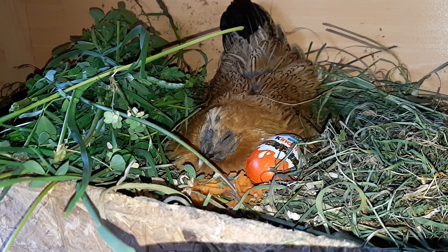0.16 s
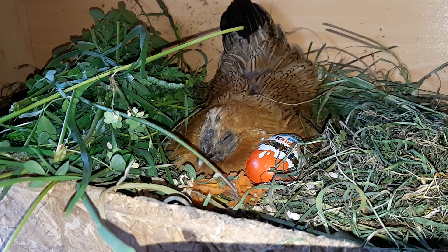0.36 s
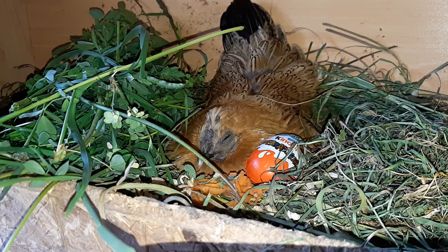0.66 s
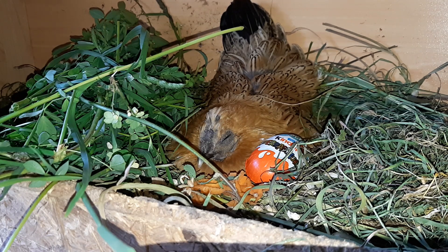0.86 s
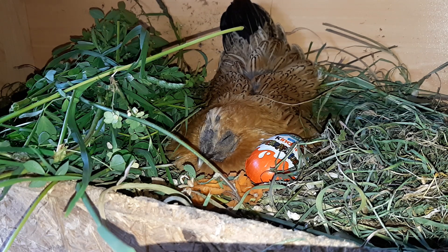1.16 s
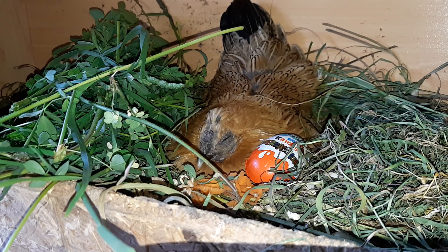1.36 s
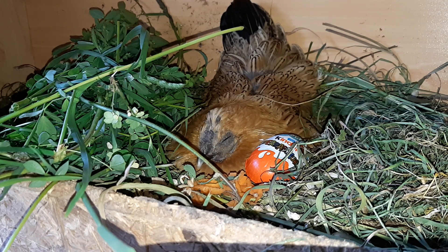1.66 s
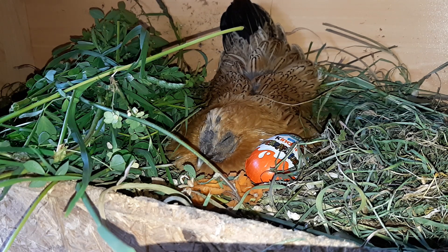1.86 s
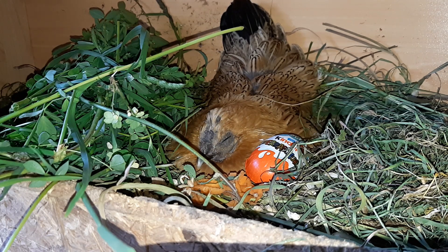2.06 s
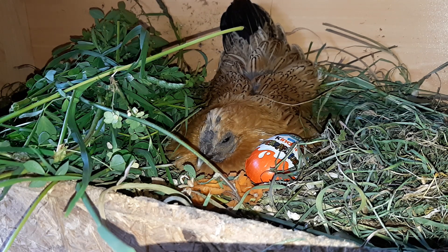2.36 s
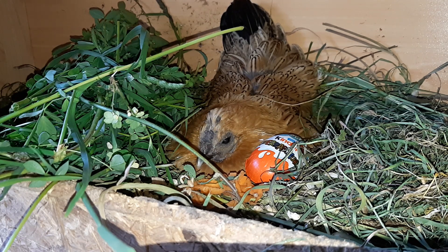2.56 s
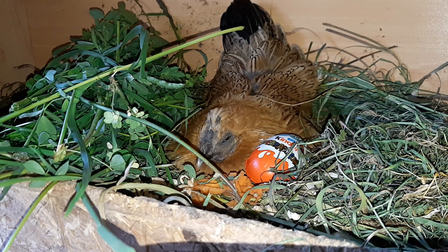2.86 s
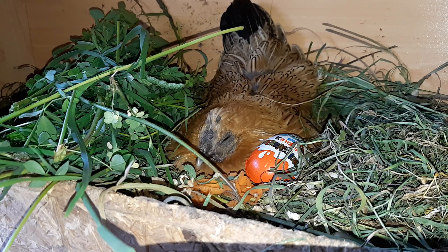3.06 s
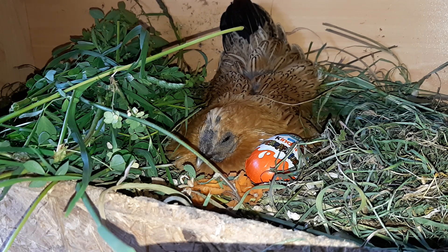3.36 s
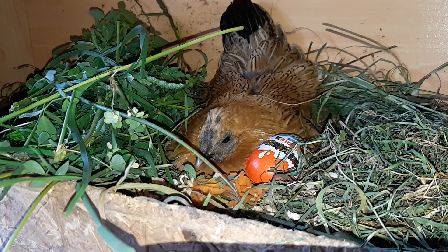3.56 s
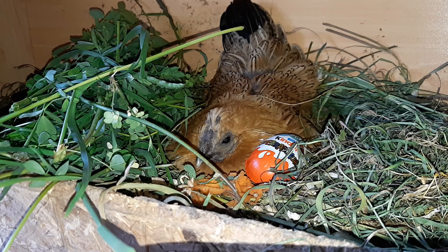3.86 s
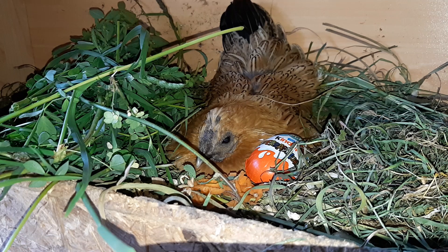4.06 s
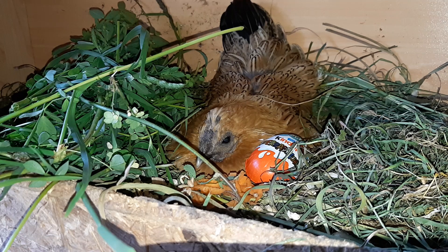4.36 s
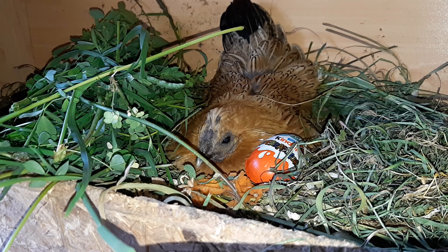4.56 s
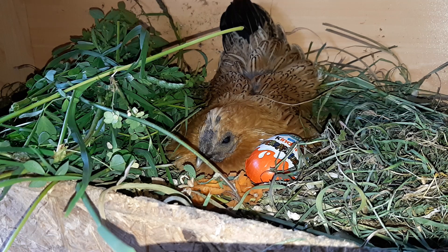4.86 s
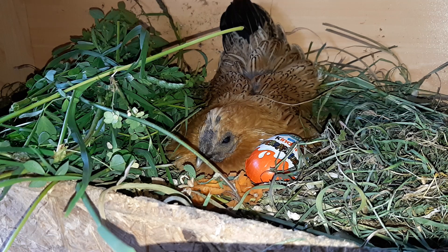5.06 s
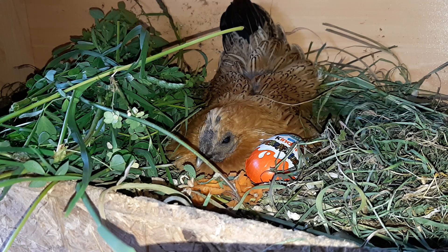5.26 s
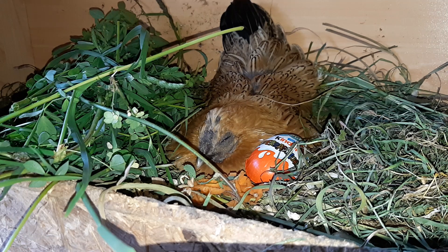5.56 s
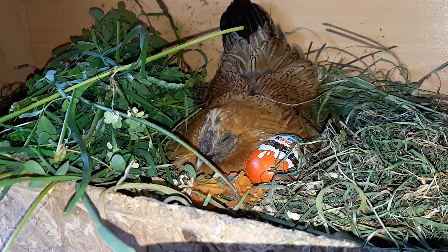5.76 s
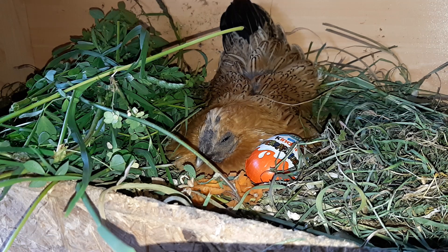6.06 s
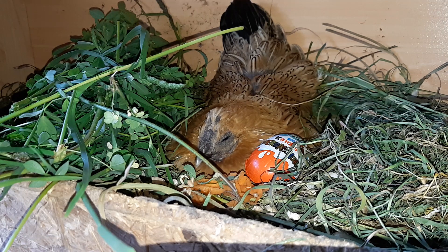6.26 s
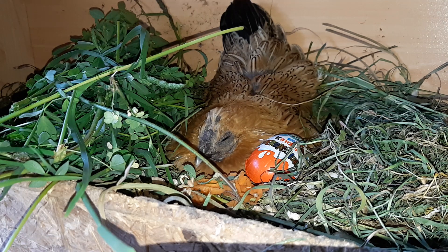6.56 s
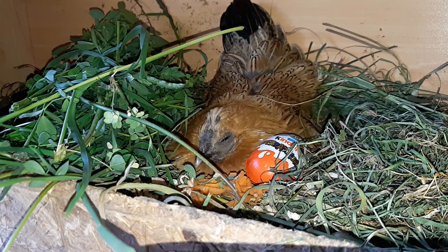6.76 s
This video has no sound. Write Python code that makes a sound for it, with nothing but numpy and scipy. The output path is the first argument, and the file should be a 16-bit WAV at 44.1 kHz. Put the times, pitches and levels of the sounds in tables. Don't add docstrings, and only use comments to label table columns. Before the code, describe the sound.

Close stereo sound inside a small wooden shed: soft steady hiss and a low rumble that swells with footfalls, strongest around 2 seconds. A hen shifts faintly in dry hay at the start, with a short rustle and woody tapping at 0.2-0.45. Small ticks come at 0.8 and 0.9, a clearer tap at 1.65. Then three hard, bright knocks at 1.87, 2.09 and 2.31 ring a sheet and fill the shed briefly; the second is hardest, the third dullest. From 2.5 to 2.95 the hen croons softly through a shut beak, low and rising, with a barely audible falling end near 3.2. Light taps and rustles follow at 3.3-3.7 and 4.0. From 4.6 to 5.9 hay crackles and snaps in bursts, strongest near 4.75 and 5.7, with dull body bumps at 5.36 and 5.82. Separate woody taps sound at 5.98, 6.64 and 6.8, with a last faint rustle.

```python
import sys
import numpy as np
from scipy import signal
from scipy.io import wavfile
from scipy.ndimage import uniform_filter1d

SR = 44100
rng = np.random.default_rng(int(sys.argv[2]) if len(sys.argv) > 2 else 0)


def ratio_of_db(decibels):
    return 10 ** (np.asarray(decibels, float) / 20)


def inscribe(sig):
    pcm = np.round(np.clip(np.atleast_2d(sig).T, -1, 1) * 32767)
    wavfile.write(sys.argv[1], SR, pcm.astype(np.int16))


N = 305613

# (frequency [Hz], 60 dB decay [s])
SHED_DECAY = [(100, 0.57), (400, 0.26), (1500, 0.24), (4000, 0.2), (9000, 0.18), (16000, .15)]
EDGE_HZ = 15850
RING_SPLIT = 0.0122
SECOND_RING_DB = -4


def evened(x):
    return x / np.sqrt(np.mean(x ** 2) + 1e-20)


def read(points, hz):
    f, value = np.transpose(points)
    return np.interp(np.log(hz + 1), np.log(f + 1), value)


def add(mix, s, sound):
    part = mix[:, round(s * SR):][:, :sound.shape[-1]]
    part += sound[..., :part.shape[1]]


def power_db(p):
    return 10 * np.log10(p + 1e-14)


def hump(hz, centre_hz, octaves):
    return np.exp(-(np.log2((hz + 1) / centre_hz) / octaves) ** 2) / centre_hz


def peaks_db(hz, peaks):
    return sum(db * np.exp(-(np.log2((hz + 1) / f) / octaves) ** 2) for f, octaves, db in peaks)


def noise(count, field_db, size=512):
    # (frequency [Hz], left-right likeness [-1 to 1])
    likeness = [(25, .985), (60, .95), (150, .91), (300, .88), (600, .68), (1200, -.35), (2500, 0.1),
                (16000, .05)]
    hop = size // 4
    hz = np.fft.rfftfreq(size, 1 / SR)[:, None]
    t = np.arange(count // hop + 5) * hop / SR
    a, b, c, d = rng.standard_normal((len(t), len(hz), 4)).T
    same = np.clip(read(likeness, hz), -1, 1)
    left = a + 1j * b
    right = same * left + np.sqrt(1 - same ** 2) * (c + 1j * d)
    z = np.array([left, right]) * ratio_of_db(field_db(hz, t)) * (hz < EDGE_HZ)
    return signal.istft(z, nperseg=size, noverlap=size - hop)[1][:, :count]


def spread(colour_db, decay, rise_s, hold_s, count, swell_s=1e-4):
    swell_hz = 2200
    standing_db = 1.6 * rng.standard_normal((257, 1))

    def field_db(hz, t):
        build_up = 1 - np.exp(-(t + 0.0037) * np.maximum(hz / swell_hz, 1) / swell_s)
        fall_db = 60 * np.maximum(t - hold_s, 0) / (decay * read(SHED_DECAY, hz))
        return colour_db(hz) + standing_db + 2 * power_db(build_up) - fall_db

    x = noise(count, field_db) * (1 - np.exp(-np.arange(count) / SR / rise_s))
    return x / np.sqrt(np.mean(x[:, 200:1500] ** 2))


def ring(modes, rise_s, alike=0.13, length=SR * 3 // 4):
    t = np.arange(length)[None] / SR
    phases = 2 * np.pi * rng.random((len(modes), 2)) * [1, 1 - alike]
    out = 0
    for (hz, db, t60), p in zip(modes, phases):
        phase = np.cumsum(p)[:, None]
        out = out + ratio_of_db(db - 60 * t / t60) * np.sin(2 * np.pi * hz * t + phase)
    return out * (1 - np.exp(-t / rise_s))


def band(db, hz, width, t60, rise_s):
    t = np.arange(SR // 4) / SR
    r = np.exp(-np.pi * width / SR)
    a, b = rng.standard_normal((2, 2, len(t) + 2000))
    slow = signal.lfilter([1], [1, -2 * r, r * r], a + 1j * b)[:, 2000:]
    tone = evened((slow * np.exp(2j * np.pi * hz * t)).real)
    return ratio_of_db(db - 60 * t / t60) * (1 - np.exp(-t / rise_s)) * tone


def swells(rows, t, shift_db=0):
    s, db, rise, fall = np.array(rows)[:, :4].T[:, :, None]
    drop_db = 20 * np.maximum((s - t) / rise, (t - s) / fall)
    return (ratio_of_db(db + shift_db - drop_db) ** 2).sum(0)


def hiss():
    # (frequency [Hz], density [dB per Hz])
    hiss_colour = [(88, -31.5), (150, 1), (292, -19), (329, -11), (408, -24.5), (487, -17), (604, -17),
                   (4140, -23), (12900, -20), (16300, -17.5)]
    level_db = -77 + 2.5
    return ratio_of_db(level_db) * evened(noise(N, lambda hz, t: read(hiss_colour, hz) - 30 * (hz < 200), size=1024))


def rumble():
    # (frequency [Hz], density [dB per Hz])
    rumble_colour = [(12, -12), (30, -4), (40, -6), (50, 3), (64, -5.5), (95, -16), (120, -13), (160, -22),
                     (210, -36.5), (300, -41.5), (800, -94)]
    # (peak time [s], peak level [dB], rise over 20 dB [s], fall over 20 dB [s])
    steps = [(.1, -65.5, 0.24, 1), (.37, -59, 0.36, 0.39), (.8, -65, 0.4, 1), (1.21, -60, 0.098, 0.2),
             (1.41, -64, 0.11, 0.17), (1.7, -54, 0.12, 0.13), (1.89, -50.5, 0.056, 0.4),
             (2.14, -45.5, 0.16, 0.24), (2.33, -48.5, 0.038, 0.33), (2.6, -66, 0.23, 0.1),
             (2.78, -72.5, 0.2, 0.2), (3.57, -65, 0.081, .12), (3.72, -56.5, 0.053, 0.27),
             (4.03, -57, 0.089, 0.23), (5.25, -60.5, 0.51, .08), (5.38, -59, .1, 0.15),
             (5.6, -58.5, 0.079, 0.67), (6.14, -66, 0.42, 0.61), (6.52, -67.5, 0.12, 0.83),
             (6.87, -69, 0.37, .3)]
    floor_db = -66.5
    t = np.arange(0, N, 256) / SR
    level = np.interp(np.arange(N) / SR, t, np.sqrt(ratio_of_db(floor_db) ** 2 + swells(steps, t)))
    return level * evened(noise(N, lambda hz, t: read(rumble_colour, hz), size=4096))


def pair(rows, first, second):
    # (frequency [Hz], width [octaves], level [dB])
    box_air = [(537, 0.11, -9), (810, 0.23, 0.5), (1178, .1, -4), (1500, .12, 3), (2223, 0.053, 3.5),
               (3200, .06, 0.5)]
    shift_db = np.array(rows)[:, 4:]

    def share(p):
        return p / p.mean() * 3 / 512

    def field_db(hz, t):
        power = share(first(hz)) * swells(rows, t) + share(second(hz)) * swells(rows, t, shift_db)
        return peaks_db(hz, box_air) + power_db(power)

    return noise(N, field_db)


def hay():
    # (peak time [s], peak level [dB], rise over 20 dB [s], fall over 20 dB [s], stems against leaves [dB])
    rustles = [(.005, -67, 0.024, 0.18, -20), (.24, -69.5, 0.16, 0.11, -9.5), (.35, -60, 0.055, 0.23, -28),
               (.425, -54.5, 0.054, 0.065, 7), (1.18, -80.5, 0.042, 0.14, 3), (1.61, -76, 0.067, 0.28, -20),
               (3.35, -60.5, 0.1, 0.067, -10), (3.445, -63, 0.11, 0.075, -21),
               (4.6, -58.5, 0.12, .3, -12.5), (4.735, -40.5, 0.093, 0.14, -5),
               (4.84, -47.5, 0.077, 0.093, -4), (4.96, -54.5, 0.23, 0.11, 0.5),
               (5.06, -58.5, 0.11, 0.47, -4.5), (5.26, -56.5, 0.09, 0.223, -8.5),
               (5.36, -54.5, 0.06, 0.13, -6), (5.55, -57.5, 0.32, 0.58, -10.5),
               (5.715, -45, 0.047, 0.15, -5), (5.68, -53, 0.19, 0.06, -7.5),
               (6.62, -78.5, .05, 0.056, -18.5), (6.83, -65, 0.065, 0.14, 0)]
    # (peak time [s], peak level [dB], rise over 20 dB [s], fall over 20 dB [s],
    # deep push against bedding [dB])
    settles = [(.03, -66.5, 0.037, 0.1, -2.5), (.25, -65.5, 0.059, 0.075, -10), (.36, -51, 0.021, 0.15, -5),
               (.425, -48.5, 0.084, 0.083, -25), (1.17, -74, 0.024, 0.093, -21),
               (3.36, -76, 0.033, .08, -3), (3.71, -79, 0.041, 0.093, 11), (4.03, -67, 0.028, 0.1, -8),
               (4.6, -72, 0.14, 0.4, 0), (4.74, -49.5, 0.064, 0.2, -2.5), (4.84, -55.5, 0.045, 0.22, 1.5),
               (4.96, -51, 0.064, 0.12, 6.5), (5.06, -64, 0.089, 0.17, 11), (5.2, -69, 0.33, 0.55, 7.5),
               (5.63, -73.5, 0.032, 0.041, 11), (5.36, -48.5, 0.019, 0.11, -2), (5.75, -54, 0.11, 0.19, -8),
               (5.84, -39, 0.039, 0.083, -5)]
    # (frequency [Hz], density [dB per Hz])
    leaves = [(1760, -20), (3000, -0.5), (5290, 0), (5930, 1.5), (9070, 2.5), (15100, -5), (16000, 4),
              (16300, -20)]
    snaps = ratio_of_db(3.4 * rng.exponential(1, N).clip(0, 3.2)) * (rng.random(N) < 400 / SR)
    crackle = signal.lfilter([1], [1, -np.exp(-1 / (0.0067 * SR))], snaps ** 2)
    sharp = signal.lfilter([1], [1, -np.exp(-1 / (0.0006 * SR))], snaps ** 2)
    blurred = 0.29 * crackle / (crackle.mean() + 1e-9)
    fronts = 0.056 * sharp / (sharp.mean() + 1e-9)
    crackle = np.sqrt(0.57 + blurred + fronts)
    dry_hay = pair(rustles, lambda hz: ratio_of_db(read(leaves, hz)) ** 2, lambda hz: hump(hz, 1920, 1.0))
    soft = pair(settles, lambda hz: hump(hz, 458, 0.91), lambda hz: hump(hz, 220, 0.94))
    return (ratio_of_db(0.98) * crackle * dry_hay + ratio_of_db(-4.5) * soft) * ratio_of_db([[-1.2], [.8]])


def boards():
    # (time [s], level [dB], frequency [Hz], width
    # [Hz], decay [s])
    board_bands = [(.2, -69.5, 727, 60, 0.39), (0.33, -55, 441, 90, 0.5), (0.391, -48, 1350, 50, 0.24),
                   (.4, -52, 2350, 59.7, 0.22), (0.406, -44.5, 1860, 40, 0.19),
                   (0.411, -46.5, 2614, 29.8, 0.18), (0.411, -51, 3140, 50, 0.19),
                   (1.59, -75, 7550, 700, 0.51), (1.59, -70, 11100, 2500, .2),
                   (1.882, -27.5, 1862, 91, .22), (2.1, -23.5, 2850, 60, 0.25), (2.311, -32, 1003, 60, .16),
                   (2.311, -23, 2640, 120, 0.17), (3.285, -52, 2570, 299, 0.17),
                   (3.285, -52, 3200, 302, 0.22), (3.285, -57, 860, 249, 0.18),
                   (3.3, -56.5, 6510, 200, 0.11), (3.33, -54.5, 739, 120, 0.19),
                   (3.405, -69.5, 3045, 149, 0.16), (3.42, -71, 5300, 250, .3), (3.43, -65, 6460, 300, .25),
                   (3.447, -76, 1900, 100, 0.28), (3.61, -67.5, 2490, 303, 0.24),
                   (3.612, -70.5, 4420, 349, 0.19), (3.615, -72, 3313, 249, 0.26),
                   (3.665, -67.5, 3300, 400, 0.31), (3.695, -68, 3200, 400, 0.2),
                   (3.695, -73, 2200, 400, 0.17), (3.691, -57.5, 1520, 200, 0.21),
                   (4.016, -69, 3510, 50, 0.21), (4.019, -67.5, 4520, 300, 0.21),
                   (4.018, -75.5, 6200, 200, 0.25), (4.018, -78.5, 7800, 250, 0.25),
                   (4.018, -71.5, 2685, 79.8, 0.19), (5.978, -55, 4740, 219.5, 0.24),
                   (5.978, -62.5, 6200, 350, 0.24), (5.978, -62, 7680, 390, 0.24),
                   (6.637, -51, 3430, 450, 0.22), (6.637, -57.5, 4800, 408, 0.23),
                   (6.636, -63, 6200, 200, 0.2), (6.636, -63, 7760, 199, 0.17),
                   (6.797, -63, 7740, 402, 0.28),
                   (1.876, -38.5, 8500, 1500, 0.23), (1.655, -63, 3360, 200, 0.11),
                  (1.654, -57, 2370, 67, 0.23), (2.3, -37, 803, 17, 0.3), (2.093, -40, 1668, 30, 0.27),
                  (2.093, -26, 2190, 70, 0.24), (2.093, -34.5, 4300, 930, 0.31),
                  (2.096, -42, 420, 20, 0.45), (2.312, -37, 1668, 33, 0.3), (2.312, -33.5, 830, 30, 0.33),
                  (2.312, -26, 2180, 33, 0.16), (2.313, -29.5, 2840, 40, .3), (2.313, -31, 1500, 89, 0.37),
                  (2.312, -29.5, 3470, 79, 0.24), (3.285, -49.5, 8500, 1206, .12),
                  (3.285, -56.5, 1300, 160, 0.21), (0.81, -66, 3550, 100, .22), (.334, -52.5, 700, 200, .3),
                  (5.825, -43.5, 400, 100, 0.33), (5.61, -62, 320, 60, .2), (4.04, -72, 4400, 200.6, .1),
                  (4.04, -77, 3470, 60.5, 0.21), (4.04, -61, 1520, 55, 0.16),
                  (5.978, -50.5, 3480, 340, 0.23), (5.978, -54, 2600, 300, .2),
                  (5.98, -67.5, 7060, 99.2, 0.24), (5.98, -66, 8900, 400, .15), (6.48, -78, 7490, 501, .25),
                  (6.585, -69.5, 6930, 250, 0.3), (6.59, -76, 3500, 200, .1),
                  (6.605, -73.5, 4000, 300, 0.095), (6.617, -69.5, 4700, 300, 0.17),
                  (6.641, -50.5, 1750, 397, 0.22), (6.915, -73.5, 7950, 900, 0.055)]
    out = np.zeros((2, N))
    for s, db, hz, width, t60 in board_bands:
        add(out, s, band(db, hz, 1.1 * width, t60, rise_s=0.0024))
    return out


def struck(hz, main_hz, second_hz, edge_hz):
    # (frequency [Hz], width [octaves], level [dB])
    plank = [(780, 0.14, 2), (1560, 0.13, 4), (2230, 0.5, 3), (3500, 0.095, 5.5), (4800, 0.029, 4)]
    below_db, above_db, edge_slope_db = 13, 5, 85
    shelf_db, shelf_hz = 7, 407
    ring_octaves, body_level_db, edge_drop_db = 0.052, -8, 11.5

    def octave(f):
        return np.log2((hz + 1) / f)

    def under(f):
        return below_db * np.maximum(-octave(f), 0)

    body_db = body_level_db - np.minimum(under(min(main_hz, second_hz)), shelf_db) - under(shelf_hz)
    body_db = body_db - above_db * np.maximum(octave(max(main_hz, second_hz)), 0)
    main = np.exp(-(octave(main_hz) / ring_octaves) ** 2)
    second = ratio_of_db(SECOND_RING_DB) ** 2 * np.exp(-(octave(second_hz) / ring_octaves) ** 2)
    edge_db = np.clip(edge_slope_db * octave(edge_hz), 0, edge_drop_db)
    return power_db(main + second + ratio_of_db(body_db + peaks_db(hz, plank)) ** 2) - edge_db


def taps():
    # (time [s], peak level [dB], main ring [Hz], second ring [Hz], top edge [Hz])
    tap_list = [(.206, -72, 1330, 745, 1630), (0.327, -57, 450, 684, 910), (.835, -53.5, 2400, 1500, 7660),
                (.899, -64, 3541, 3350, 4230), (1.654, -40.5, 2300, 1930, 4870),
                (2.523, -51.5, 3430, 7000, 10000), (2.585, -62.5, 2980, 3550, 3770),
                (3.283, -44, 1928, 1000, 16300), (3.329, -57, 780, 630, 1320),
                (3.409, -69, 3000, 2970, 3500), (3.448, -69, 1637, 1720, 1900),
                (3.61, -58, 1520, 2310, 5500), (3.69, -55.5, 1450, 1560, 3600),
                (4.016, -59.5, 1520, 4460, 5000), (4.676, -40.5, 6100, 2500, 16000),
                (5.817, -32.5, 698, 1794, 3200), (5.978, -38.5, 450, 1500, 7800),
                (6.636, -43.5, 926, 1494, 2600), (6.795, -45.5, 753, 1130, 2374)]
    ring_db, ring_cycles = -9.5, 270
    out = np.zeros((2, N))
    for s, db, main_hz, second_hz, edge_hz in tap_list:
        colour_db = lambda hz: struck(hz, main_hz, second_hz, edge_hz)
        blow = spread(colour_db, decay=0.97, rise_s=0.00011, hold_s=0.02, count=SR // 4)
        add(out, s, ratio_of_db(db - 8.5) * blow)
        modes = []
        for hz, less_db in [(main_hz, 0), (second_hz, SECOND_RING_DB)]:
            for split in (1, 1 + RING_SPLIT):
                modes.append((hz * split, db + ring_db + less_db, min(ring_cycles / hz, .21)))
        add(out, s, ring(modes, rise_s=0.0066, length=SR // 4))
    return out


def loose_parts():
    # (time [s], peak level [dB], frequency [Hz], decay [s])
    part_rings = [(0.208, -62.5, 1345, 0.32), (0.223, -67, 1556, 0.32), (.385, -47.5, 780, 0.18),
                  (0.411, -47.5, 1690, 0.18), (.334, -62, 762, 0.26), (0.369, -61, 1333, 0.34),
                  (.415, -60, 2200, 0.21), (0.41, -71, 2430, 0.18), (0.414, -49.5, 3260, 0.15),
                  (1.657, -60, 2325, 0.22), (1.657, -64, 7800, 0.2), (4.019, -74.5, 4450, 0.14),
                  (3.33, -66, 824, 0.13), (3.665, -67, 3500, 0.12), (3.665, -72, 3010, 0.17),
                  (3.692, -65, 1504, 0.15), (3.694, -62.5, 1010, 0.095), (4.019, -59, 1520, 0.12),
                  (4.019, -66, 1050, 0.077), (4.02, -71, 3460, 0.14), (5.984, -59, 438, 0.33),
                  (5.98, -59.5, 708, 0.34), (5.98, -52.5, 1500, 0.19), (6.638, -68, 5180, 0.14),
                  (6.638, -50.5, 1528, 0.14), (6.637, -55, 2200, 0.18), (6.8, -62, 409, 0.16)]
    out = np.zeros((2, N))
    for s, db, hz, t60 in part_rings:
        modes = [(hz, db, t60), (hz * (1 + RING_SPLIT), db + 5, t60), (hz * (1 - 2.8 * RING_SPLIT), db, t60)]
        add(out, s, ring(modes, rise_s=0.0045, length=SR // 3))
    return out


def knocks():
    # (time [s], peak level [dB], treble 4-16 kHz [dB], left-right [dB], band favoured by the spot struck [Hz])
    knock_list = [
        (1.872, -15, -12.5, -1, 1949),
        (2.089, -9.5, -15.5, -1.4, 2770),
        (2.308, -10.5, -18, -1.5, 1550),
    ]
    # (frequency [Hz], density [dB per Hz])
    knock_colour = [(60, -20), (200, -22), (380, -12.5), (490, -5.5), (610, -9), (790, -1), (1050, -11.5),
                    (1500, 1.77), (1950, -3), (2400, -7.5), (2880, -4), (3300, -8), (5000, -14.5),
                    (16000, -35.5)]
    # (frequency [Hz], level under the knock [dB], decay [s])
    sheet = [(465, -28.5, 0.66), (489, -21.5, 0.33), (755, -27.5, 0.25), (803, -20.5, 0.32),
             (1480, -26.5, 0.22), (1520, -21.5, 0.28), (1560, -21.5, .28), (1668, -20.5, 0.23),
             (1887, -20.5, 0.22), (1372, -22, 0.24), (2575, -23.5, 0.13), (2890, -20.5, 0.24),
             (2860, -23, .22)]
    # (frequency [Hz], level under the knock [dB], decay [s])
    wall = [(84, -27, 0.72)]
    out = np.zeros((2, N))
    for s, db, treble_db, pan_db, spot_hz in knock_list:
        def colour_db(hz):
            tilt = np.clip(np.log2(hz / 2500 + 1e-9), 0, 1)
            spot_db = peaks_db(hz, [(spot_hz, 0.23, 1.5)])
            return read(knock_colour, hz) + (treble_db + 15.5) * .7 * tilt + spot_db

        blow = spread(colour_db, decay=1.13, rise_s=0.00082, hold_s=0.021, count=SR // 2, swell_s=.007)
        rings = ring(sheet, rise_s=0.01, alike=0.8) + ring(wall, rise_s=0.028, alike=0.93)
        add(out, s, ratio_of_db(db + pan_db * np.array([[.5], [-.5]])) * ratio_of_db(-8.5) * blow)
        add(out, s, ratio_of_db(db) * rings)
    return out


def stem_snaps():
    # (time [s], peak level [dB], lowest frequency [Hz], decay [s])
    ticks = [
        (1.873, -37.5, 3500, 0.17),
        (3.285, -59, 7000, .09),
        (4.945, -53.5, 7000, 0.04),
        (5.614, -59, 11160, 0.025),
        (5.7, -54, 3000, .03),
        (5.84, -65, 11880, 0.037),
        (5.818, -50, 3500, .12),
        (6.089, -63.5, 11500, 0.018),
        (6.796, -62.5, 6500, 0.087),
    ]
    out = np.zeros((2, N))
    for s, db, low_hz, t60 in ticks:
        snap = noise(900, lambda hz, t: -40 * (hz < low_hz) - 60 * t / t60, size=128)
        add(out, s, ratio_of_db(db) * evened(snap))
    return out


def croon(rows):
    # (frequency [Hz], level [dB])
    throat = [(400, 6), (640, -0.5), (850, -4), (1080, -6.5), (1180, -15), (1400, -26), (2000, -53)]
    jitter, shimmer_db = .004, 3.5
    s, *columns = np.transpose(rows)
    t = np.arange(s[0], s[-1], 1 / SR)
    hz, effort_db, over_db = (uniform_filter1d(np.interp(t, s, c), size=300) for c in columns)
    wobble = uniform_filter1d(rng.standard_normal((len(t), 9)), size=500, axis=0)
    wobble = evened(uniform_filter1d(wobble, size=300, axis=0)).T
    turns = np.cumsum(hz * (1 + jitter * wobble[0])) / SR
    over = 0
    for k in range(2, 9):
        over = over + ratio_of_db(read(throat, k * hz) + shimmer_db * wobble[k]) * np.cos(2 * np.pi * k * turns)
    rasp = evened(noise(len(t), lambda f, u: power_db(hump(f, 340, 0.99)) - 30 * (f > 1200))[0])
    fundamental = np.sqrt(2) * np.cos(2 * np.pi * turns)
    voice = ratio_of_db(effort_db) * (fundamental + ratio_of_db(over_db + 0.4) * over + ratio_of_db(-15) * rasp)
    voice = np.pad(voice * signal.windows.tukey(len(t), .12), (0, SR // 3))[None]
    tail = noise(SR // 3, lambda f, u: -60 * u / (0.5 * read(SHED_DECAY, f)))
    wet = signal.fftconvolve(voice, tail / np.linalg.norm(tail[0]), axes=1)[:, :voice.shape[1]]
    return s[0], voice * ratio_of_db([[-1.6], [-.4]]) + ratio_of_db(-10.0) * wet


def thumps():
    # (time [s], peak level [dB], frequency [Hz], decay [s])
    thump_list = [
        (4.958, -52, 311.6, 0.3),
        (5.05, -47.5, 316, 0.2),
        (5.357, -37.5, 303, 0.056),
        (5.393, -53, 288, 0.18),
        (5.82, -45, 272.4, 0.16),
        (3.699, -53, 51.6, 0.79),
    ]
    out = np.zeros((2, N))
    for s, db, hz, t60 in thump_list:
        modes = [(hz, db + 5.5, t60), (hz * 1.12, db, t60), (hz * 0.89, db - 33, t60)]
        add(out, s, ring(modes, rise_s=0.0033, alike=0.8))
    return out


def blade_cracks():
    # (time [s], level [dB], frequency [Hz], decay [s])
    cracks = [(4.594, -54.5, 8000, 0.078), (4.676, -39.5, 9320, 0.1), (4.68, -42.5, 4920, .06),
              (4.714, -41, 4100, 0.07), (4.735, -44.5, 13100, .015), (4.745, -37, 9600, .02),
              (4.754, -33.5, 8900, 0.032), (4.825, -55, 5970, 0.028), (4.944, -53.5, 2720, 0.053),
              (5.235, -56.5, 6030, .1), (5.285, -59, 3500, 0.12), (5.343, -55, 7000, .1),
              (5.612, -52, 3500, 0.022), (5.702, -38, 10630, .018), (5.703, -48.5, 14200, .015),
              (5.713, -50, 3870, .03), (5.715, -52, 9000, 0.018), (5.724, -42, 11900, .012),
              (5.729, -53, 5960, .02), (4.841, -43, 11100, .03), (4.62, -61, 5000, .03),
              (5.06, -56, 7380, .08), (5.201, -58.5, 4500, 0.088), (5.529, -64, 5900, 0.041),
              (5.655, -55, 8050, 0.035), (5.76, -48, 4900, .03), (5.738, -50, 10000, .012)]
    out = np.zeros((2, N))
    for s, db, hz, t60 in cracks:
        add(out, s, band(db, hz, 0.36 * hz, t60, rise_s=0.00011))
    return out


def scene():
    # (time [s], pitch [Hz], effort [dB], mouth opening as overtone level [dB])
    phrases = [
        [(2.49, 203.5, -57, -12), (2.55, 213.2, -54, -10.5), (2.61, 217.7, -53.5, -21),
         (2.665, 213.5, -58.5, -12), (2.722, 217.4, -52, -18), (2.755, 245, -59.5, -11),
         (2.802, 261.3, -51.5, -14), (2.825, 263, -68, -5), (2.86, 262.4, -70, -8)],
        [(2.855, 268.5, -67, -8), (2.88, 274, -58, -16), (2.9, 274, -49.5, -1), (2.918, 278, -83, 6),
         (2.945, 281, -72, 6.5), (2.968, 281.5, -85.5, 5)],
        [(3.155, 299, -81.5, -20.5), (3.178, 291, -63, -7.5), (3.215, 270, -77, -0.5), (3.24, 262, -90, 12)],
    ]
    mix = rumble() + hay() + boards() + taps() + loose_parts()
    mix += knocks() + stem_snaps() + thumps() + blade_cracks()
    for rows in phrases:
        add(mix, *croon(rows))
    return mix


def top_cut(x):
    return signal.sosfilt(signal.butter(12, 16490, fs=SR, output="sos"), x)


def record(dry):
    low = signal.oaconvolve(dry, signal.firwin(201, EDGE_HZ, fs=SR)[None], "same")
    over_edge = ratio_of_db(-22) * (dry - low)
    return top_cut(low + over_edge + hiss())


dry = scene()
out = record(dry)
inscribe(out)
```